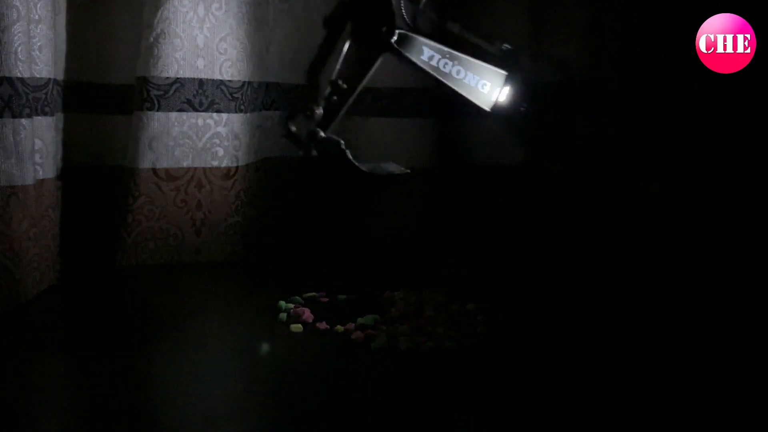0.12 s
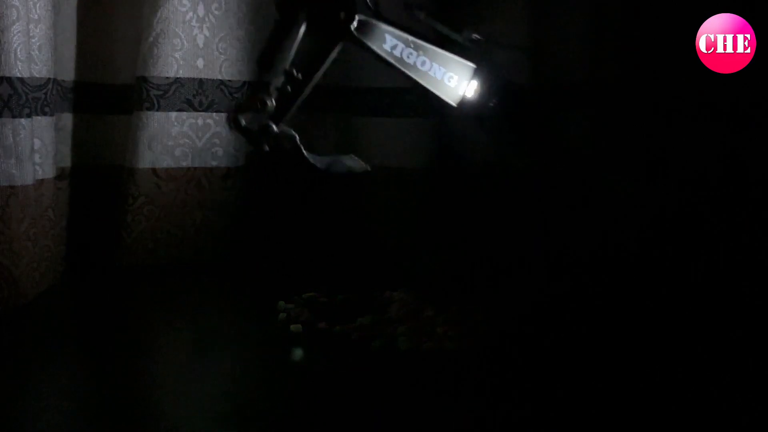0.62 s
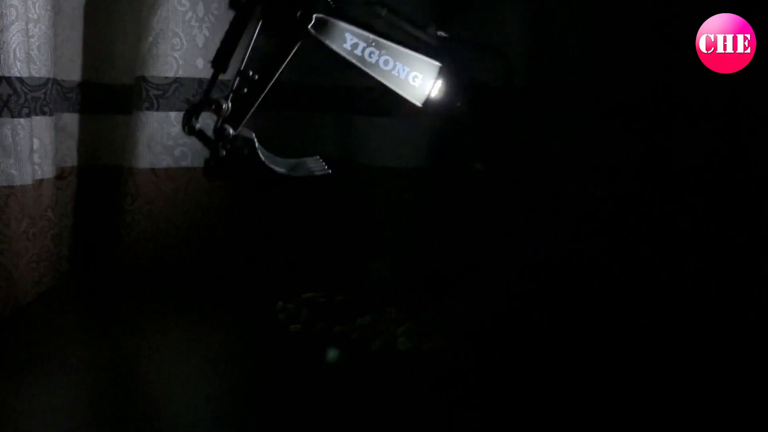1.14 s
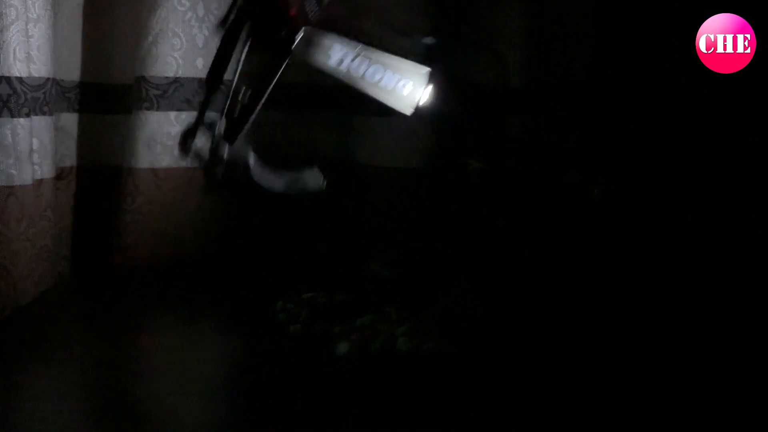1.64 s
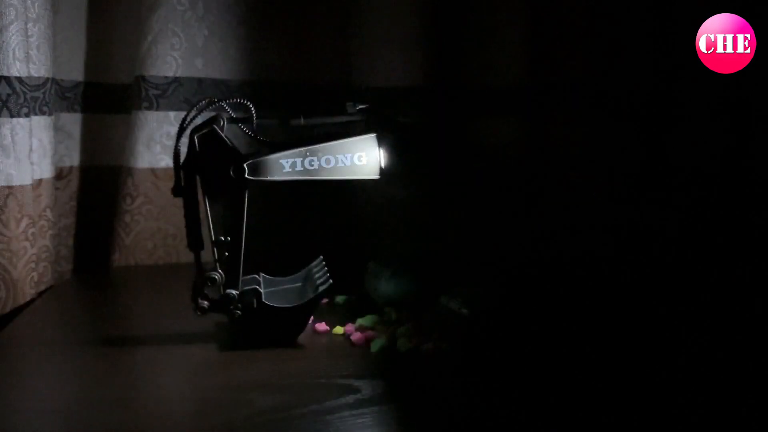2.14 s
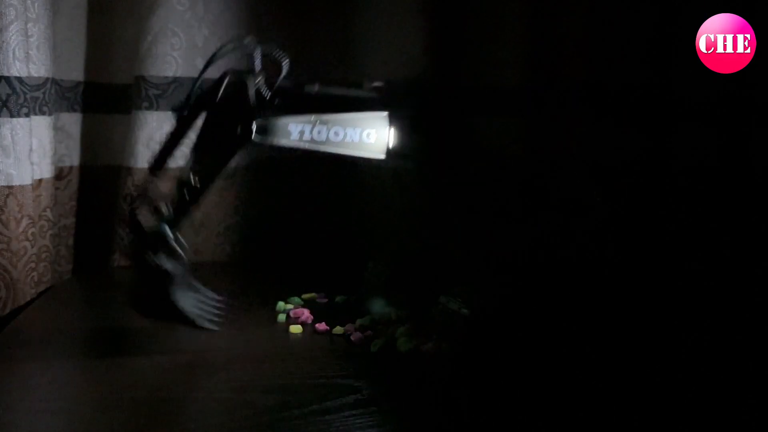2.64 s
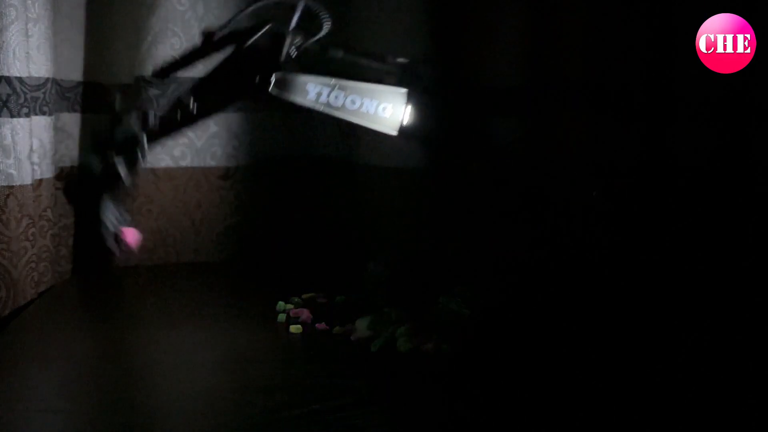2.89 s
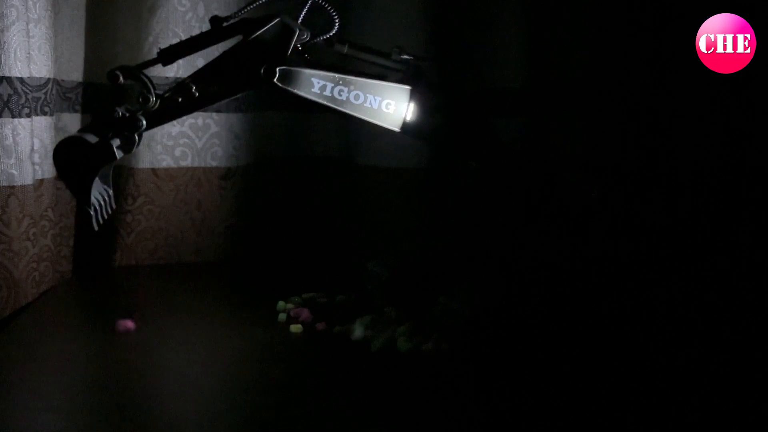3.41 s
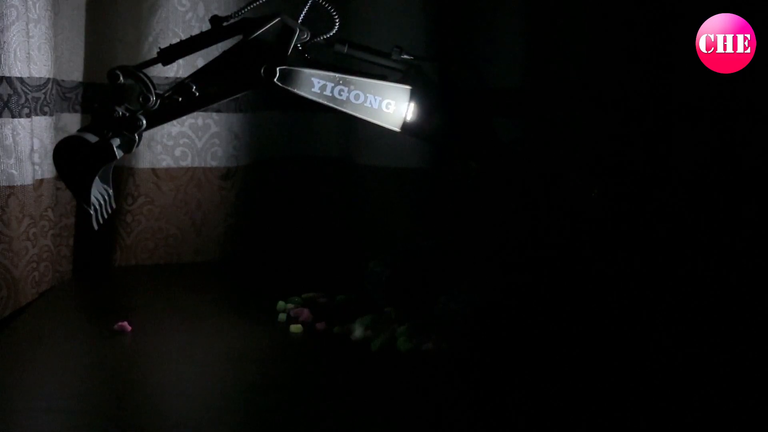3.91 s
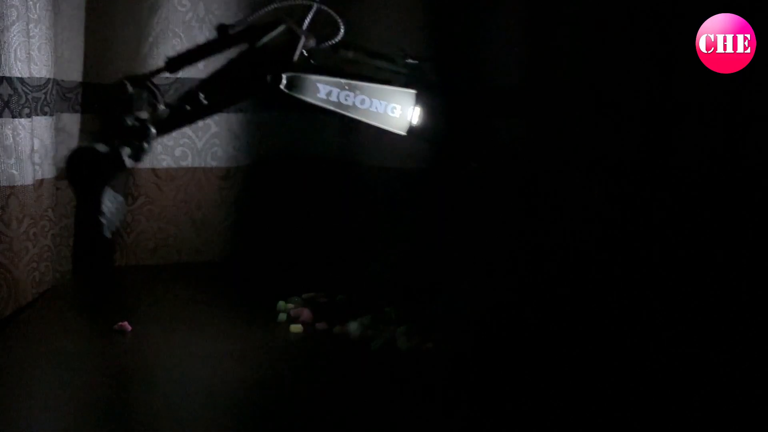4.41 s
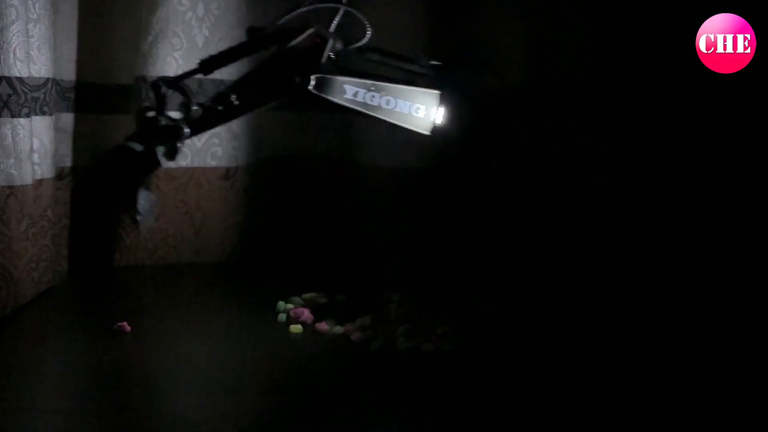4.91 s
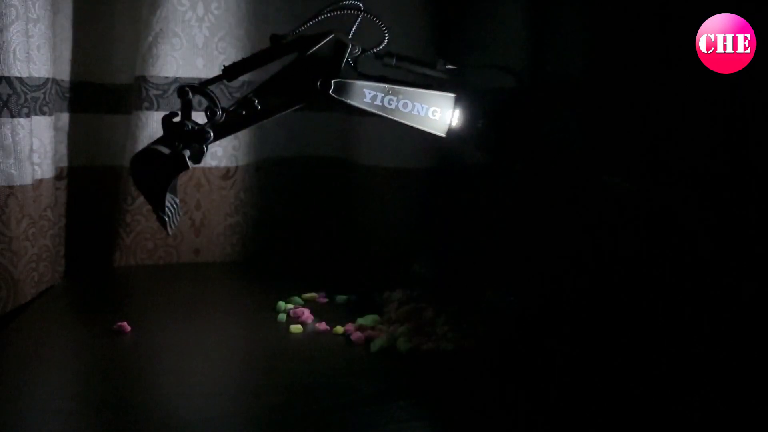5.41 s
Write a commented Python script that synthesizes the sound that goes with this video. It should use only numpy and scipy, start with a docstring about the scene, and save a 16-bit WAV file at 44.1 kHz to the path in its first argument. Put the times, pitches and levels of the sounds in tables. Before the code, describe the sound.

Geared toy motors whirr over a low room hum, with joint ticks, a hard floor knock, bright clinks and a skittering bead.

```python
"""A toy digger works on a hard floor in a small room, over a steady low hum with a rumble that comes and goes.
First a geared motor grinds, throbbing once per turn of its gear wheel, while a fast motor whines on shaft
overtones and stops with a rasp; joints tick now and then. Next a slower motor whines with spells of gear noise.
Meanwhile the bucket knocks the floor (noise bursts through resonances) and a steel pin clinks (dying sines).
A dropped bead bounces and skitters, then the geared motor grinds in three more short bursts."""
import sys
import numpy as np
from scipy import signal
from scipy.fft import rfft, irfft, next_fast_len
from scipy.io import wavfile
from scipy.ndimage import map_coordinates

SR = 44100
rng = np.random.default_rng(int(sys.argv[2]) if len(sys.argv) > 2 else 0)


def to_wav(s):
    """Save 16-bit WAV."""
    ch = np.atleast_2d(s).T  # columns
    pcm = np.round(np.clip(ch, -1, 1) * 32767)  # PCM
    wavfile.write(sys.argv[1], SR, pcm.astype(np.int16))


def voltage_ratio(decibels):
    """Convert decibels (scalar or array-like) to amplitude ratios, 20 dB per decade."""
    exponent = np.asarray(decibels, float) / 20
    return 10 ** exponent


N = 244314
T = np.arange(N) / SR  # time of each sample, s
DB_PER_DOUBLING = 20 * np.log10(2)  # turns a slope in dB per octave into a power of frequency

# In all tables, t60 is the time a sound takes to fade by 60 dB.
# Colour of the room hum: (frequency [Hz], level [dB])
HUM_COLOUR = [(22, -24), (50, -7), (226, -8.5), (350, -7), (524, -13.5), (687, -9), (902, -16), (1320, -12),
              (1830, -24), (8140, -40), (10100, -39.5), (11300, -70), (13000, -65), (15700, -44)]
# Low bands that stand out of the hum: (centre [Hz], width [Hz], level [dB])
HUM_BANDS = [(50.3, 6.2, 0.5), (111, 28, -9), (145, 6.3, -11.5), (339, 33, -5)]
# Left-right likeness of the hum: (frequency [Hz], likeness [-1 to 1])
HUM_LIKENESS = [(60, 1), (150, 0.92), (380, 0.72), (800, 0.14), (6000, -0.068), (15000, 0.48)]
HUM_DB = -44.5
# Rumble under the hum: (time [s], level [dB])
RUMBLE_LEVEL = [(0, -52), (.28, -46), (.5, -58), (4.5, -57), (4.62, -45.5), (4.85, -52), (4.95, -71)]

# Bursts of the geared motor: (switched on [s], switched off [s], gear noise before its fall at low speed [dB],
# a moment when the wheel's tight spot meshes [s], rattle against noise [dB], rattle brightness [dB per octave],
# overtones against noise [dB], rasp of the slack teeth while coasting against noise [dB])
GRIND_BURSTS = [(-.4, 0.886, -39, .26, -.6, -5, -10.5, -3.5), (4.246, 4.503, -38, 4.461, 2, -1, -4, -7.5),
                (4.769, 5.033, -38.5, 4.982, 2.5, -1.5, -4, -3), (5.457, 5.7, -36, 5.4, 1.5, -2, -3, -5)]
# Colour of the steady gear noise: (frequency [Hz], level [dB])
GEARBOX_COLOUR = [(500, -17.5), (900, -15), (1400, -2.5), (2400, -7), (4000, -1.5), (5500, -13.5),
                  (6900, -7.5), (9000, -16.5), (11000, -13), (15700, -16.5)]
# Housing resonances rung at the tight spot: (centre [Hz], width [Hz], level [dB])
TIGHT_SPOT_RINGS = [(1332, 216, -1.5), (2054, 96, 2), (2550, 195, 1), (3480, 350, -0.5), (4075, 220, 6.5),
                    (5360, 720, -4), (6900, 82, 3.5)]
# Colour of the geared motor's overtones: (frequency [Hz], level [dB])
GRIND_TONE = [(700, -13), (1200, -10), (1700, -7), (2400, -11), (3400, -14), (4500, -17), (5800, -16),
              (7000, -5), (9000, -17), (15000, -16.5)]
# Resonances of the coasting rasp: (centre [Hz], width [Hz], level [dB])
RASP_RINGS = [(2550, 230, -0.5), (3630, 300, 1), (4430, 830, -2)]
GEAR_RATIO = 14.1  # shaft turns per wheel turn
FULL_SPEED, SPIN_UP_S = 417, .062  # turns per s; time constant of the spin-up
SAG_PER_S, COAST_PER_S = 16, 1480  # turns per s lost each second, while driven and while coasting
# Speeds under which the gears fall quiet (turns per s), and how steeply they do
KNEE_DRIVEN, KNEE_COASTING, STEEP = 335, 240, 5.85
RATTLE_PITCHED = .9  # strength of the shaft's own pulses inside the rattle, against its noise

# Speed of the fast motor: (time [s], shaft speed [turns per s])
FAST_SPEED = [(0, 389), (.164, 396), (.204, 387), (.266, 402), (.316, 399.5), (.36, 410.5), (.448, 400.5),
              (.488, 413.5), (.534, 411.5), (.59, 421), (.7, 423), (.785, 411.5), (.83, 410), (.865, 402),
              (.895, 400)]
# Colour of its overtones: (frequency [Hz], level [dB])
FAST_TONE = [(700, -21), (1200, 3), (2500, -5), (4600, 6), (5400, -6.5), (7500, -5), (10000, -0.5),
             (12000, -5), (15000, -11.5)]
# Overtones its gear teeth favour: (multiple of shaft speed, at its slowest [dB], at its fastest [dB])
FAST_FAVOURED = [(3, -1, -4), (6, -2.5, 8.5), (9, -6.5, 0), (10, 1.5, -7), (11, 4, -2), (12, 2, -5),
                 (14, 0, 2), (15, 4.5, 2), (20, 1, 5), (35, -2, 9), (38, 7, 5)]
FAST_SLOWEST, FAST_FASTEST = 390, 422  # turns per s
FAST_DB, FAST_THROB_DB = -36, 1.5
STOP_HZ, STOP_WIDTH_HZ, STOP_DB, STOP_T60_S = 4450, 600, -38, .45  # rasp as the fast motor stops

# Ticks of the joints: (time [s], peak [dB], lower ring [Hz], upper ring before mixing [dB])
JOINT_TICKS = [(0.067, -22, 4900, -3), (.608, -20.5, 4210, -3), (1.238, -47.5, 3950, -5),
               (1.314, -47, 4200, -12), (4.274, -41, 6900, 3), (4.592, -24, 5200, -12),
               (4.797, -50, 4600, 3), (5.327, -34, 2633, -18), (5.447, -39.5, 4400, 5)]

# Speed of the slow motor: (time [s], shaft speed [turns per s])
SLOW_SPEED = [(1.54, 150), (1.617, 169), (1.675, 184), (1.73, 188.5), (2.08, 188.5), (2.17, 189.5),
              (2.374, 180.6), (2.72, 167.8), (2.92, 166.5)]
# Level of its overtones: (time [s], level [dB])
SLOW_LEVEL = [(1.54, -51.5), (1.6, -46.5), (2.0, -40.5), (2.19, -46), (2.45, -44.5), (2.7, -46),
              (2.86, -49.5), (2.92, -58)]
# Colour of its overtones: (frequency [Hz], level [dB])
SLOW_TONE = [(700, -13), (1100, -3.5), (1600, -5), (2500, -5.5), (4000, -14), (5800, -20.5), (8800, -19),
             (11000, -15.5), (15000, -24.5)]
# Overtones its gear teeth favour: (multiple of shaft speed, under load [dB], running free [dB])
SLOW_FAVOURED = [(5, -2, -4), (6, -4, -4), (31, 7, -6), (57, 3, 5), (75, 4, 8), (9, 4, 9.5), (10, 3, -8),
                 (12, 0, 6), (13, 4, 0), (26, 5, 0), (48, 6, 6), (51, 4, 9)]
# Colour of its gear noise: (frequency [Hz], level [dB])
SLOW_GEAR_COLOUR = [(500, -23), (900, -1), (1900, 1.5), (3300, -1), (5500, -6.5), (6800, -3.5), (8000, -17),
                    (11000, -14), (15500, -28)]
# Spells of gear noise: (start [s], end [s], growl [dB], hiss [dB])
SLOW_GEAR_SPELLS = [(1.543, 2.155, -47, -47), (2.358, 2.476, -46.5, -75), (2.74, 2.92, -54, -51)]
GEAR_RISE_S, GEAR_FALL_S = 0.043, 0.01
LOADED_DB, FREE_DB = 3.5, -3  # middle overtones during the first spell, and outside it
HOUSING_HZ, HOUSING_WIDTH_HZ, HOUSING_DB = 1560, 75, 7  # overtones swell as they sag through it
IDLE_DB = -62  # gear noise that stays between the spells

# Bucket on the floor: (time [s], peak [dB], brightness [dB per octave])
BUCKET_KNOCKS = [(2.0284, -12, 2.5), (2.035, -12, 1.5), (2.781, -33, -8), (2.863, -28.5, -6)]
# Resonances of the bucket: (centre [Hz], width [Hz], level [dB])
BUCKET_RINGS = [(670, 215, -8), (1097, 214, 3), (1960, 330, -0.5), (2500, 274, -1.5), (3390, 650, -13.5),
                (5120, 1700, -24.5)]

# Clinks of the pin: (time [s], peak [dB], how near the pin's end it is struck [dB])
PIN_CLINKS = [(2.7532, -30.5, 17), (2.805, -26, 22), (2.8538, -12.5, 4), (2.8809, -9, -6.5)]
# Ways the pin rings: (frequency [Hz], level [dB], t60 [s], gain (+) or loss (-) when struck at the end [factor])
PIN_MODES = [(4300, -11, 0.007, 0.78), (6920, -2.5, 0.031, -0.61), (8110, -3, 0.033, -1.9),
             (8610, 0.5, 0.03, 0.18), (9900, -18, 0.027, 0.12), (12660, -9, 0.044, -0.081),
             (13700, -20, 0.0344, 0), (14930, -18, 0.031, 0.18)]
CRACK, CRACK_T60_S = .3, 0.027  # noise of the pin's contact, mixed in with its ring

# Bounces of the bead: (time [s], peak before the lean [dB], brightness [dB per octave])
BEAD_BOUNCES = [(3.0124, -5, -1.5), (3.175, -11, -4.5), (3.303, -15, -3), (3.3481, -18, 1),
                (3.3973, -27.5, -3.5), (3.4255, -22, -2.5), (3.4616, -25, 0), (3.492, -36, 1.5),
                (3.5048, -27, 2.5), (3.5307, -31.5, 6.5)]
# Resonances of bead and floor: (centre [Hz], width [Hz], level [dB])
BEAD_RINGS = [(1113, 183, -2.5), (2380, 780, 0), (3350, 880, 5), (4400, 1750, 1), (7000, 840, 2),
              (8830, 1280, -2.5), (13800, 2000, -9)]
# Skitter of the bead: (time [s], level [dB])
SKITTER_LEVEL = [(3.3, -65.5), (3.36, -57), (3.45, -52), (3.54, -49.5), (3.6, -67.5)]
BEAD_LEAN_DB = 5  # left over right, for the bounces

# The room's answer: (frequency [Hz], t60 [s], strength of the part that differs between the sides [factor])
ROOM_FADE = [(510, 0.64, 0.76), (3000, 0.29, 0.92), (12300, 0.25, 1)]
# Lead between the microphone ports: (frequency [Hz], angle by which left leads [radians])
PORT_LEAD = [(300, 0), (1550, -.8), (1900, .1), (3300, .6), (4500, .2), (6800, 1.1), (7600, 2), (8300, 0),
             (10400, -2.6), (12300, -3.5), (13500, -6.2), (16200, -6.8)]
# Lean between the microphone ports: (frequency [Hz], left over right [dB])
PORT_LEAN = [(200, -16), (800, -3), (2400, 0), (6000, 2.5), (15000, 1.5)]
TOP_HZ = 15750  # the band limit


def unit(x):
    """Scales a sound to rms 1."""
    return x / np.sqrt(np.mean(x ** 2) + 1e-20)


def along(points, hz):
    """Reads a curve of (frequency, value) points on a log frequency axis."""
    f, v = np.transpose(points)
    return np.interp(np.log(hz + 1), np.log(f + 1), v)


def curves(rows):
    """Gives one value per sample for each column after the time; the end values are held."""
    s, *cols = np.transpose(rows)
    return [np.interp(T, s, c) for c in cols]


def running(rows):
    """Is 1 inside the table's time span, with short fades, but no fade at the very start of the scene."""
    inside_s = np.minimum(T - rows[0][0], rows[-1][0] - T)
    return np.clip(inside_s / 0.0023 + (T < .1), 0, 1)


def wobble(rate):
    """Draws a random curve with this many corner points a second."""
    return map_coordinates(rng.standard_normal(int(N * rate / SR) + 4), [T * rate], order=1)


def filtered(x, response):
    """Multiplies the spectrum of x by a complex response of frequency."""
    m = next_fast_len(x.shape[-1] + 8192)
    return irfft(rfft(x, m) * response(np.fft.rfftfreq(m, 1 / SR)), m)[..., :x.shape[-1]]


def coloured(x, spectrum):
    """Shapes x with a (frequency, dB) spectrum and scales it to rms 1."""
    return unit(filtered(x, lambda hz: voltage_ratio(along(spectrum, hz))))


def resonances(peaks):
    """Adds up resonances, with every other one turned upside down."""
    def response(f):
        return sum((-1) ** k * voltage_ratio(db) * 1j * f * w / (c * c - f * f + 1j * f * w)
                   for k, (c, w, db) in enumerate(peaks))
    return response


def overtones(speed, spectrum, unsteady_db, extra_db):
    """Sums sines at multiples k of the shaft speed, each wavering in level, then colours them to rms 1."""
    turn = 2 * np.pi * np.cumsum(speed) / SR
    count = int(17800 / speed.max())  # no overtone goes above 17800 Hz
    total = np.zeros(N)
    for k in range(2, count + 1):
        level = voltage_ratio(extra_db(k) + unsteady_db * wobble(18))
        total += level * np.sin(k * turn + rng.uniform(0, 6.43))
    return coloured(total, spectrum)


def gear_noise(speed, gate):
    """Makes noise that swells once per shaft turn; a larger gate swells deeper."""
    return rng.standard_normal(N) * np.exp(gate * np.cos(2 * np.pi * np.cumsum(speed) / SR))


def blows(rows, response, t60, strike=3, size=4096):
    """Sends a dying noise burst through a body for each blow, tilted in brightness and set to its peak."""
    out, t = np.zeros(N + size), np.arange(size) / SR
    for s, db, tilt_db, *_ in rows:
        burst = rng.standard_normal(size) * voltage_ratio(-60 * t / t60)
        burst[0] += strike  # a click at first contact
        slope = tilt_db / DB_PER_DOUBLING
        hit = filtered(burst, lambda f: response(f) * (1j * (f + 30) / 3000) ** slope)
        out[round(s * SR):][:size] += voltage_ratio(db) * hit / np.abs(hit).max()
    return out[:N]


def background():
    """Makes a steady noise hum, stronger in a few low bands, with a slowly changing rumble under it."""
    def shape(hz):
        return voltage_ratio(along(HUM_COLOUR, hz)) * (1 + 1.66 * np.abs(resonances(HUM_BANDS)(hz)))

    def mid_and_side(hz):
        # the more alike the sides, the more goes to the middle
        angle = np.arccos(np.clip(along(HUM_LIKENESS, hz), -1, 1)) / 2
        return shape(hz) * [np.cos(angle), np.sin(angle)]

    mid, side = filtered(rng.standard_normal((2, N)), mid_and_side)
    hum = unit(np.array([mid + side, mid - side]))
    rumble_noise = rng.standard_normal((2, N)) + 0.76 * rng.standard_normal(N)  # partly shared by the sides
    rumble = coloured(rumble_noise, [(20, -37), (45, 1.0), (80, -8.0), (130, -42), (300, -90)])
    return voltage_ratio(HUM_DB) * hum + voltage_ratio(curves(RUMBLE_LEVEL)[0]) * rumble


def grinder():
    """Gears hiss and the shaft sings; the wheel's tight spot rattles the housing once per wheel turn."""
    speeds = []
    for on, off, *_ in GRIND_BURSTS:
        driven_s = np.clip(T, on, off) - on
        spin = (FULL_SPEED - SAG_PER_S * driven_s) * (1 - np.exp(-driven_s / SPIN_UP_S))
        speeds.append(np.maximum(spin - COAST_PER_S * np.maximum(T - off, 0), 0))
    speed = np.max(speeds, axis=0)
    wheel = np.cumsum(speed) / SR / GEAR_RATIO  # turns so far

    steady = coloured(gear_noise(speed, gate=0.27), GEARBOX_COLOUR)
    below_db = -.11 * np.clip(405 - speed, 0, 200)  # overtones sing best near full speed

    def extra_db(k):
        if k in (3, 4):  # louder, and weakened only while speeding up
            return 5 + below_db * (np.gradient(speed) > 0)
        return below_db

    pulses = overtones(speed, [(500, 0), (9000, 0)], unsteady_db=4, extra_db=lambda k: 0)
    tone = overtones(speed, GRIND_TONE, unsteady_db=4.5, extra_db=extra_db)
    fast = np.clip(speed / 400, 0, 1) ** 2  # the rattle fades as the motor slows
    driven = np.clip((speed - 250) / 70, 0, 1)  # the tone dies at low speed
    rasp = unit(filtered(gear_noise(speed, gate=0.39), resonances(RASP_RINGS)))

    out = np.zeros(N)
    for own, (on, off, db, tight_s, rattle_db, tilt_db, tone_db, rasp_db) in zip(speeds, GRIND_BURSTS):
        coasting = np.clip((T - off) / 0.028, 0, 1)
        knee = KNEE_DRIVEN + (KNEE_COASTING - KNEE_DRIVEN) * coasting
        level = voltage_ratio(db) / np.sqrt(1 + (knee / (own + 1)) ** STEEP)
        from_tight_spot = wheel - np.interp(tight_s, T, wheel)
        tight = np.exp(2.1 * (np.cos(2 * np.pi * from_tight_spot) - 1)) * voltage_ratio(.7 * wobble(28))
        shaking = (gear_noise(speed, gate=0.35) + RATTLE_PITCHED * pulses) * tight
        slope = tilt_db / DB_PER_DOUBLING
        rattle = unit(filtered(shaking, lambda f: resonances(TIGHT_SPOT_RINGS)(f) * ((f + 300) / 3000) ** slope))
        layers = steady + voltage_ratio(tone_db) * driven * tone
        layers = layers + voltage_ratio(rattle_db) * fast * rattle + voltage_ratio(rasp_db) * coasting * rasp
        out += level * layers
    return out


def fast_motor():
    """A three-pole rotor favours every third overtone; the other favoured ones shift with speed; it ends in a rasp."""
    speed, = curves(FAST_SPEED)
    quick = np.clip((speed - FAST_SLOWEST) / (FAST_FASTEST - FAST_SLOWEST), 0, 1)
    # throbs at the wheel's pace for a shaft at 404 turns per s
    throb_db = FAST_THROB_DB * np.cos(2 * np.pi * (T - GRIND_BURSTS[0][3]) * 404 / GEAR_RATIO)

    def extra_db(k):
        favoured = sum((low + (high - low) * quick) * (k == m) for m, low, high in FAST_FAVOURED)
        return 4 * (k % 3 == 0) + favoured + throb_db * (k < 6)

    whine = overtones(speed, FAST_TONE, unsteady_db=2.5, extra_db=extra_db)
    since = T - FAST_SPEED[-1][0]
    rasp = unit(filtered(rng.standard_normal(N), resonances([(STOP_HZ, STOP_WIDTH_HZ, 0)])))
    rasp_level = (since > 0) * voltage_ratio(STOP_DB - 60 * np.abs(since) / STOP_T60_S)
    return rasp_level * rasp + running(FAST_SPEED) * voltage_ratio(FAST_DB) * whine


def joints():
    """The slack in a plastic joint closes with a small tick: a noise burst through two resonances."""
    out = np.zeros(N)
    for s, db, hz, top_db in JOINT_TICKS:
        body = resonances([(hz, 260, 0), (6900, 700, top_db)])
        out += blows([(s, db, 0)], body, t60=0.055, strike=2.5)
    return out


def slow_motor():
    """A lower whine with spells of gear noise; load lifts the middle overtones and shifts the favoured ones."""
    speed, = curves(SLOW_SPEED)
    tone_db, = curves(SLOW_LEVEL)
    spells = [np.clip(np.minimum((T - a) / GEAR_RISE_S, (b - T) / GEAR_FALL_S + 1), 0, 1)
              for a, b, *_ in SLOW_GEAR_SPELLS]
    load = spells[0]  # only the first spell is under load
    load_db = FREE_DB + (LOADED_DB - FREE_DB) * load

    def extra_db(k):
        favoured = sum((free + (loaded - free) * load) * (k == m) for m, loaded, free in SLOW_FAVOURED)
        middle = load_db * np.exp(-((k - 7) / 6) ** 2)
        housing = HOUSING_DB * np.exp(-((k * speed - HOUSING_HZ) / HOUSING_WIDTH_HZ) ** 2)
        return favoured + middle + housing

    whine = overtones(speed, SLOW_TONE, unsteady_db=2.6, extra_db=extra_db)
    gears = coloured(gear_noise(speed, gate=.4), SLOW_GEAR_COLOUR) * voltage_ratio(1.3 * wobble(25))
    growl = filtered(gears, lambda hz: 1 / (1 + (hz / 3200) ** 4))
    hiss = gears - growl
    noise = voltage_ratio(IDLE_DB) * gears
    for on, (_, _, growl_db, hiss_db) in zip(spells, SLOW_GEAR_SPELLS):
        noise = noise + on * (voltage_ratio(growl_db) * growl + voltage_ratio(hiss_db) * hiss)
    return running(SLOW_SPEED) * (voltage_ratio(tone_db) * whine + noise)


def bucket():
    """The bucket knocks the floor: short bursts with a hard first click ring its resonances."""
    return blows(BUCKET_KNOCKS, resonances(BUCKET_RINGS), t60=0.055, strike=10.1)


def pin():
    """Every clink rings the pin's modes as dying sines; where it is struck shifts their balance."""
    out, t = np.zeros(N), np.arange(SR // 5) / SR
    for s, db, end_db in PIN_CLINKS:
        ring = np.zeros(len(t))
        for hz, level, t60, end in PIN_MODES:
            mode_db = level + end_db * end + rng.normal(0, 0.73)
            ring += voltage_ratio(mode_db - 60 * t / t60) * np.sin(2 * np.pi * hz * t)
        crack = CRACK * voltage_ratio(-60 * t / CRACK_T60_S) * rng.standard_normal(len(t))
        clink = ring * (1 - np.exp(-t / 0.00069)) + crack
        out[round(s * SR):][:len(t)] += voltage_ratio(db) * clink / np.abs(clink).max()
    return out


def bead():
    """Bounces ring bead and floor off to one side; a skitter of tiny contacts swells, then stays very faint."""
    lean = voltage_ratio([[BEAD_LEAN_DB / 2], [-BEAD_LEAN_DB / 2]])
    bounces = blows(BEAD_BOUNCES, resonances(BEAD_RINGS), t60=0.034) * lean
    contacts = rng.standard_normal(N) * (rng.random(N) < 900 / SR)  # about 900 a second
    skitter = unit(filtered(contacts, resonances(BEAD_RINGS)))
    return bounces + voltage_ratio(curves(SKITTER_LEVEL)[0]) * skitter


def room(x):
    None
    noise = rng.standard_normal((2, SR // 3))
    hz, t, (both, apart) = signal.stft(noise, SR, nperseg=256)
    t60 = along([(f, fade) for f, fade, _ in ROOM_FADE], hz)[:, None]
    share = along([(f, differs) for f, _, differs in ROOM_FADE], hz)[:, None]
    sides = np.array([both + share * apart, both - share * apart])
    tail = signal.istft(sides * voltage_ratio(-60 * t / t60), SR, nperseg=256)[1]
    delayed = np.pad(x, (350, 0))[None]  # the answer comes 350 samples late
    return signal.fftconvolve(delayed, tail / np.linalg.norm(tail[0]), axes=1)[:, :N]


def scene():
    """Everything near reaches two microphone ports with a lead and lean that depend on frequency."""
    motors = grinder() + fast_motor() + slow_motor()
    pin_sides = pin() * voltage_ratio([[-.3], [.3]])
    near = motors + bucket() + joints() + pin_sides + bead()
    heard = near + voltage_ratio(-10) * room(near.mean(axis=0))

    def ports(hz):
        half = voltage_ratio(along(PORT_LEAN, hz) / 2) * np.exp(1j * along(PORT_LEAD, hz) / 2)
        return np.array([half, 1 / half])

    return filtered(heard, ports) + background()


def low_pass(x):
    """Removes everything above the highest recorded frequency."""
    return signal.sosfilt(signal.butter(12, 16660, fs=SR, output="sos"), x)


def record(dry):
    """Turns everything above the band limit down by 25 dB, so only strong treble pokes through."""
    mix = filtered(dry, lambda hz: voltage_ratio(-25 * (hz > TOP_HZ)))
    return low_pass(mix)


dry = scene()
out = record(dry)
to_wav(out)
```